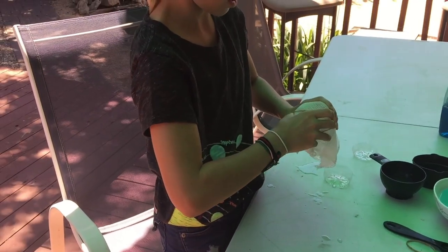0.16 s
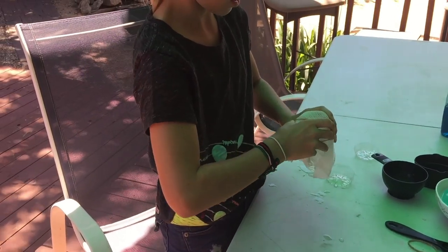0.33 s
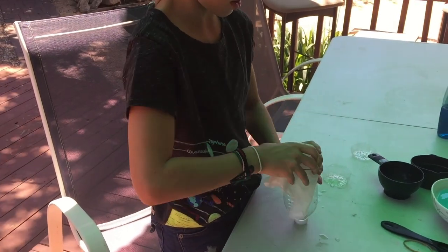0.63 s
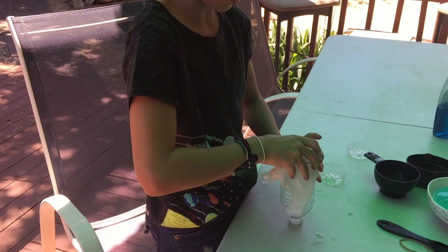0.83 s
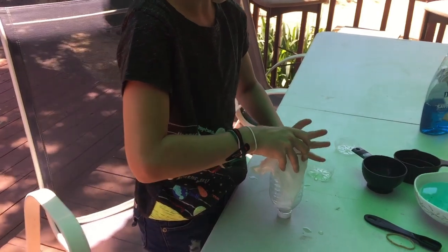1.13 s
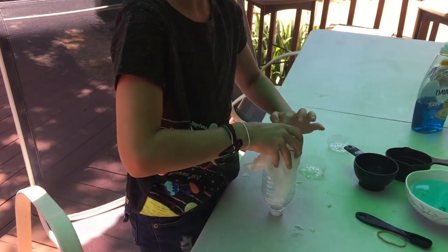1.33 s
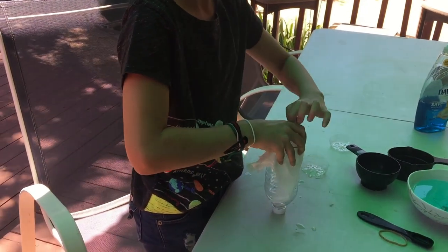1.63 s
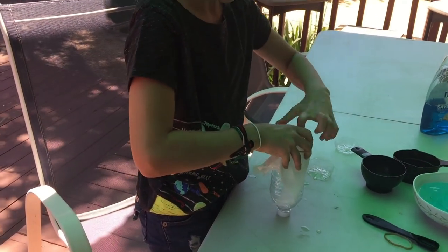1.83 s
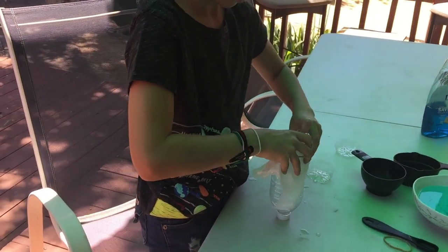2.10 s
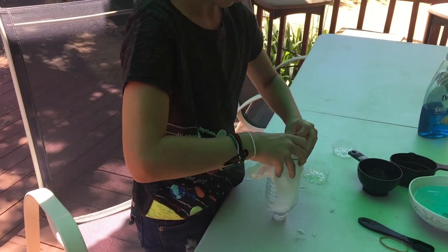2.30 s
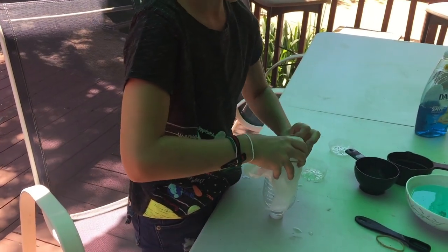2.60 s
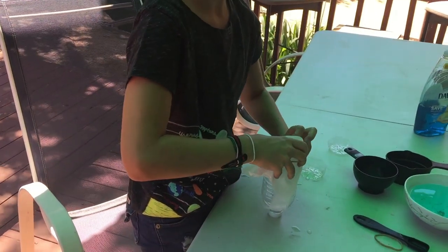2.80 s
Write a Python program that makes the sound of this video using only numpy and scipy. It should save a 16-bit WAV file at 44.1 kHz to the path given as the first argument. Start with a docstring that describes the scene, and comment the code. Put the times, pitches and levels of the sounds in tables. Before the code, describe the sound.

A thin plastic bottle crinkles and snaps under squeezing hands, with one dull knock on a table.

```python
"""A garden table outdoors: hands grip and squeeze a thin plastic bottle, and its wall buckles in sharp snaps.
Snaps, single or in clusters, layer band-limited noise bursts, a falling hollow pop and ringing wall modes.
The upturned bottle knocks on the table (burst, pop, table modes) and its neck skids briefly in tiny slips.
Fingers pat (short sine thuds) and rub (coloured friction grains); faint squeaks are sagging sine tones.
Decaying noise echoes make deck and walls answer snaps and knock, over a quiet hush of coloured noise."""
import sys
import numpy as np
from scipy import signal
from scipy.fft import rfft, irfft, next_fast_len
from scipy.io import wavfile
from scipy.ndimage import uniform_filter1d, map_coordinates

SR = 44100
rng = np.random.default_rng(int(sys.argv[2]) if len(sys.argv) > 2 else 0)


def put_to_file(sound):
    """Save the sound as 16-bit audio at rate SR, in the file named by the first command-line argument."""
    columns = np.atleast_2d(sound).T  # one column per channel
    safe = np.clip(columns, -1, 1)
    whole_steps = np.round(safe * 32767)
    wavfile.write(sys.argv[1], SR, whole_steps.astype(np.int16))


N = 130095  # samples


# buckles of the wall: t/s, then level/dB of hollow body, panel, crack, click and sizzle
BUCKLES = [(0.4115, -48.5, -32.5, -39, -55, -69), (0.4188, -49.5, -37.5, -33.5, -32, -40.5),
           (0.4474, -46, -46, -65, -67, -72), (0.4751, -49, -42.5, -42, -52.5, -77),
           (0.5442, -43, -37, -36, -41.5, -55), (0.6031, -56, -40.5, -34.5, -41.5, -45),
           (0.6177, -74, -48, -42, -58, -66), (0.631, -56, -48, -39.5, -40, -55),
           (0.7358, -40, -61, -48, -53.5, -75), (0.904, -45, -43, -44.5, -54, -70),
           (0.993, -58, -57, -59, -62, -68), (1.012, -70, -50, -68, -67, -63),
           (1.0408, -55.5, -58, -70, -79, -84), (1.0863, -42.5, -31, -28.5, -29, -37),
           (1.2299, -56, -57, -57, -58, -56), (1.2524, -42.5, -19, -22.5, -21.5, -26),
           (1.3591, -49, -42.5, -44.5, -46.5, -58), (1.4673, -55.5, -38.5, -27.5, -27, -32),
           (1.5267, -43.5, -33.5, -29, -38.5, -62), (1.556, -47.5, -29, -21.5, -22, -32.5),
           (1.5756, -51, -33, -37, -48, -56), (1.6924, -41.5, -42, -35, -38, -43),
           (1.696, -30.5, -25, -23.5, -22.5, -27), (1.7159, -37.5, -29.5, -20, -20.5, -29.5),
           (1.874, -74, -48, -41.5, -43.5, -47.5), (1.9814, -62, -50.5, -57.5, -77, -78),
           (2.0499, -49.5, -30, -23.5, -22.5, -33), (2.2448, -41.5, -38, -37.5, -52, -76),
           (2.2864, -36.5, -28.5, -33, -37, -45), (2.3163, -63, -35, -38, -42.5, -67),
           (2.3547, -42, -29.5, -29.5, -33, -42), (2.4096, -42.5, -45, -53, -44, -46),
           (2.4139, -35.5, -23.5, -22.5, -22.5, -26.5), (2.5666, -51, -32.5, -27.5, -37, -42),
           (2.5722, -41, -33, -25.5, -30.5, -40), (2.576, -50, -26, -24, -26.5, -30),
           (2.5877, -42.5, -24, -20, -23.5, -30), (2.6125, -39, -24.5, -24.5, -28, -29.5),
           (2.6232, -42, -31.5, -24, -23.5, -30.5), (2.7988, -32.5, -31.5, -43.5, -53, -72),
           (2.811, -40, -36.5, -25.5, -24.5, -42.5)]
# those five layers, low to high: lower edge f/Hz, upper edge f/Hz
LAYER_BANDS = [(220, 1000), (1300, 2700), (2700, 4700), (4700, 9300), (9300, 16000)]
# their envelopes: rise t/s, buckle t60 t/s, ring level/dB against the buckle, ring t60 t/s
LAYER_ENVELOPES = [(0.0013, 0.018, 2, 0.046), (0.000916, 0.0068, -12.5, 0.027),
                   (.0007, 0.0065, -29.5, 0.072), (0.00043, 0.0055, -15, 0.043),
                   (0.00051, 0.0076, -14.5, 0.055)]
# modes of the bottle wall: f/Hz, relative level/dB, t60 t/s
WALL_MODES = [(416, -15.5, 0.021), (525, -5, 0.057), (605, -17, 0.014), (1532, -6, 0.035),
              (1780, -18, .025), (2543, -14.5, 0.048), (3575, -17, 0.032), (4398, -12.5, 0.033),
              (5133, -4.5, 0.017)]
MODE_SPREAD = 0.031  # the grip retunes the modes (share of f)
MODE_RISE_S = 0.00045
BODY_NOISE_DB = -4  # the irregular share of the hollow body
SIDES = 3


def snaps():
    """Each buckle bursts and pops, then the wall rings; every side of the bottle radiates its own version."""
    out = np.zeros(N)
    t = np.arange(SR // 12) / SR
    filters = [signal.butter(3, band, 'band', fs=SR, output='sos') for band in LAYER_BANDS]
    envelopes = []
    for rise, t60, ring_db, ring_t60 in LAYER_ENVELOPES:
        buckle = amp(-60 * np.maximum(t - rise, 0) / t60)
        wall_ring = amp(ring_db - 60 * t / ring_t60)
        envelopes.append(np.minimum(t / rise, 1) ** 2 * (buckle + wall_ring))

    for s, *levels in BUCKLES:
        for side in range(SIDES):
            modes = ring(WALL_MODES, t, MODE_SPREAD) * (1 - np.exp(-t / MODE_RISE_S))
            bursts = []
            for sos, envelope in zip(filters, envelopes):
                noise = unit(signal.sosfilt(sos, rng.standard_normal(2 * len(t))))
                bursts.append(noise[len(t):] * envelope)  # second half: the filter has settled
            bursts[0] = amp(BODY_NOISE_DB) * bursts[0] + pop(t)
            snap = np.zeros(len(t))
            for db, sos, burst in zip(levels, filters, bursts):
                snap += amp(db) * struck(signal.sosfilt(sos, burst + modes))
            add(out, s, answer(snap) / np.sqrt(SIDES))
        add(out, s, snap)  # only the last side is heard directly
    return out


# low bending waves arrive highest first
POP_START_HZ, POP_END_HZ, POP_GLIDE_S = 1078, 476.8, 0.00215
# level before the hit is scaled, time of the peak, pitch scatter (log share)
POP_DB, POP_PEAK_S, POP_SPREAD = -5, 0.0031, 0.064


def pop(t):
    """The hollow part of a hit: a few cycles that fall in pitch."""
    glide = POP_END_HZ + (POP_START_HZ - POP_END_HZ) * np.exp(-t / POP_GLIDE_S)
    hz = glide * np.exp(POP_SPREAD * rng.standard_normal())
    swell = t / POP_PEAK_S * np.exp(1 - t / POP_PEAK_S)
    return amp(POP_DB) * swell * np.sin(2 * np.pi * np.cumsum(hz) / SR)


# tone of the dull crack: f/Hz, level/dB
CRACK_COLOUR = [(60, -58), (150, -5), (260, -18), (470, 5.5), (720, -2), (1000, -8), (1250, -12),
                (1560, -5.5), (2300, -21.5), (3500, -19.5), (5000, -31), (9000, -43), (15000, -50)]
# modes of the table with the bottle on it: f/Hz, relative level/dB, t60 t/s
TABLE_MODES = [(159, -12.5, 0.51), (353, 12, 0.078), (451, 4, 0.061), (675, 5, 0.045), (767, -19, 0.045),
               (982, 4, 0.13), (1502, 4, 0.14), (1940, -8, 0.12)]
KNOCK_S, KNOCK_DB, CRACK_T60_S = .6528, -19.5, 0.016
KNOCK_POP_DB, KNOCK_RING_DB = -7.5, -12.5  # against the crack


def knock():
    """The neck lands on the table: a dull crack, the bottle's hollow pop and the table's ring."""
    out = np.zeros(N)
    t = np.arange(SR // 4) / SR
    burst = rng.standard_normal(len(t)) * amp(-60 * t / CRACK_T60_S)
    crack = struck(coloured(burst, CRACK_COLOUR))
    hollow = amp(KNOCK_POP_DB) * struck(pop(t))
    table = amp(KNOCK_RING_DB) * struck(ring(TABLE_MODES, t, 0.0055))
    hit = amp(KNOCK_DB) * struck(crack + hollow + table)
    add(out, KNOCK_S, hit)
    add(out, KNOCK_S, answer(hit))
    return out


# course of the skid: t/s, level/dB
SKID_LEVEL = [(.66, -60), (.672, -43), (.692, -44), (.709, -35), (.722, -36.5), (.742, -45.5), (.77, -50),
              (.795, -49.5), (.825, -63)]
# tone of the scrape: f/Hz, level/dB
SCRAPE_COLOUR = [(60, -43), (160, -9), (250, -21), (480, -1), (700, -2), (1000, -6.5), (1500, -11.5),
                 (2400, -16.5), (4000, -22.5), (6000, -38), (13000, -55)]
SLIPS_PER_S, SKID_RING_DB = 1400, -5.5  # ring against the scrape


def skid():
    """The neck slides in tiny slips that keep the table ringing."""
    grains = slips(SLIPS_PER_S)
    table = ring(TABLE_MODES, np.arange(SR // 4) / SR, 0.0036)
    ringing = signal.fftconvolve(grains, table)[:N]
    scrape = unit(coloured(grains, SCRAPE_COLOUR))
    return amp(curve(SKID_LEVEL)) * (scrape + amp(SKID_RING_DB) * unit(ringing))


# soft pats of the fingers: t/s, peak level/dB, f/Hz, length t/s
FINGER_PATS = [(1.238, -36.5, 97, 0.011), (1.248, -49, 59.4, 0.035), (2.018, -36.5, 149, 0.01),
               (2.022, -43, 73, .02), (2.203, -50, 322, 0.0073), (2.9024, -39, 406, 0.0057)]


def pats():
    """Soft fingers push the bottle: a low thud of a cycle or two."""
    out = np.zeros(N)
    for s, db, hz, length in FINGER_PATS:
        t = np.arange(int(length * SR)) / SR
        swell = np.sin(np.pi * t / length)
        add(out, s, amp(db) * swell * np.sin(2 * np.pi * hz * t))
    return out


# course of the rubbing before its trim: t/s, level/dB
RUB_LEVEL = [(-.05, -73.5), (.17, -73), (.25, -61), (.37, -73.5), (.6, -60), (.84, -72), (.96, -78),
             (1.01, -56.5), (1.1, -63.5), (1.22, -60.5), (1.42, -68), (1.8, -68), (1.94, -73), (2.02, -64),
             (2.21, -65), (2.52, -61.5), (2.76, -59), (3, -68.5)]
# tone of skin on plastic: f/Hz, level/dB
SKIN_COLOUR = [(100, -8), (250, -8), (430, 2), (750, 5), (1500, 6), (2500, 7), (4000, -0.5), (6200, 0),
               (8500, -11.5), (13000, -13), (16000, -42)]
RUB_TRIM_DB, RUB_FLUTTER_DB, RUB_GRAINS_PER_S = 2.5, 3, 6500


def rub():
    """Skin drags faintly over the plastic in a dense run of friction grains."""
    level = curve(RUB_LEVEL) + RUB_TRIM_DB + RUB_FLUTTER_DB * wobble(30)
    grains = coloured(slips(RUB_GRAINS_PER_S), SKIN_COLOUR)
    return amp(level) * unit(patchy(grains))


# faint squeaks: t/s, length t/s, start f/Hz, end f/Hz, peak level/dB
FAINT_SQUEAKS = [(0.314, 0.045, 1233, 1230, -59), (1.868, 0.072, 1400, 1080, -58.5),
                 (2.174, 0.07, 3830, 3660, -57.5)]


def squeaks():
    """Faint, slightly unsteady tones in the background that sag in pitch."""
    out = np.zeros(N)
    for s, length, start, end, db in FAINT_SQUEAKS:
        u = np.linspace(0, 1, int(length * SR))
        hz = (start + (end - start) * u) * (1 + 0.054 * wobble(220)[:len(u)])
        add(out, s, amp(db) * np.sin(np.pi * u) * np.sin(2 * np.pi * np.cumsum(hz) / SR))
    return out


# decay of the late answer: f/Hz, t60 t/s
LATE_T60 = [(300, 0.38), (1500, 0.24), (4500, 0.32), (9000, 0.26), (15000, 0.22)]
# tone of the late answer: f/Hz, level/dB
LATE_COLOUR = [(200, -4.5), (700, -2), (2000, -1), (6000, -1.5), (15000, 0)]
LATE_DB, NEAR_DB, NEAR_T60_S, ARRIVE_S = -16, -10, 0.1, 0.0052


def answer(x):
    """The quick scatter from table and body and the later answer of deck and walls, as decaying noise."""
    t = np.arange(SR // 2) / SR
    late_noise, near_noise = rng.standard_normal((2, len(t)))
    hz, s, z = signal.stft(late_noise, SR, nperseg=256)
    decay_db = along(LATE_COLOUR, hz)[:, None] - 60 * s / along(LATE_T60, hz)[:, None]
    late = signal.istft(z * amp(decay_db), SR, nperseg=256)[1][:len(t)]
    arrive = 1 - np.exp(-(t / ARRIVE_S) ** 2)
    near = near_noise * arrive * amp(-60 * t / NEAR_T60_S)
    tail = amp(LATE_DB) * unit(late * arrive) + amp(NEAR_DB) * unit(near)
    return signal.fftconvolve(x, tail / np.sqrt(len(t)))


# tone of the garden air: f/Hz, relative level/dB
AIR_COLOUR = [(15, -24), (35, -11), (55, 6), (95, 8), (160, 3.5), (280, -9.5), (410, 2), (560, -17.5),
              (780, -19.5), (1200, -5.5), (1900, -16.5), (2500, -8), (4800, -12.5), (6200, -10.5),
              (8500, -21.5), (14000, -20), (16000, -25)]
HUSH_DB, HUSH_WAVER_DB = -63.5, 2.3


def hush():
    """Quiet, uneven garden air: coloured noise that wavers in level."""
    air = coloured(rng.standard_normal(N), AIR_COLOUR)
    return amp(HUSH_DB + HUSH_WAVER_DB * wobble(7.06)) * unit(patchy(air))


PATCH_DB, PATCH_TOP_HZ = 4.5, 5000  # swing in the lows, frequency where it halves


def patchy(x):
    """Let the bands of a sound swell and fade on their own; the high hiss stays smoother."""
    hz, _, z = signal.stft(x, SR, nperseg=1024)
    field = uniform_filter1d(rng.standard_normal(z.shape), size=4, axis=0)  # blur across frequency
    field = unit(uniform_filter1d(field, size=5, axis=1))  # blur across time
    swing_db = PATCH_DB * field / (1 + hz[:, None] / PATCH_TOP_HZ)
    return signal.istft(z * amp(swing_db), SR, nperseg=1024)[1][:N]


def ring(modes, t, spread):
    """Damped modes, each with a fresh strength and a slight detuning."""
    hz, db, t60 = np.transpose(modes)[:, :, None]
    strength, detune = rng.standard_normal((2, len(modes), 1))
    level = np.sign(strength) * amp(db + 2 * strength - 60 * t / t60)
    return np.sum(level * np.sin(2 * np.pi * hz * (1 + spread * detune) * t), axis=0)


def slips(rate):
    """Tiny friction impulses of random size, rate a second."""
    return (rng.random(N) < rate / SR) * rng.standard_normal(N)


def coloured(x, points):
    """x through a causal minimum-phase filter with the given (Hz, dB) shape."""
    m = 2 * next_fast_len(len(x) // 2 + 4096)
    cepstrum = irfft(np.log(amp(along(points, np.fft.rfftfreq(m, 1 / SR)))), m)
    cepstrum[1:m // 2] *= 2  # fold onto positive time
    cepstrum[m // 2 + 1:] = 0
    return irfft(rfft(x, m) * np.exp(rfft(cepstrum)), m)[:len(x)]


def struck(x):
    """Scale a hit so that its opening 6 ms have rms 1."""
    return x / np.sqrt(np.mean(x[:round(.006 * SR)] ** 2) + 1e-20)


def unit(x):
    """Scale to rms 1."""
    return x / np.sqrt(np.mean(x ** 2) + 1e-20)


def amp(db):
    """Decibels to gain."""
    return 10 ** (np.asarray(db) / 20)


def along(points, hz):
    """Interpolate (Hz, value) points on a log frequency axis."""
    f, v = np.transpose(points)
    return np.interp(np.log(hz + 1), np.log(f + 1), v)


def curve(rows):
    """(s, dB) rows as one level per sample, -120 dB outside them."""
    return np.interp(np.arange(N) / SR, *np.transpose(rows), left=-120, right=-120)


def wobble(rate):
    """A smooth random curve, rate knots a second."""
    knots = rng.standard_normal(int(N * rate / SR) + 4)
    return map_coordinates(knots, [np.arange(N) * rate / SR])


def add(track, s, x):
    """Mix x into the track at time s."""
    i = max(round(s * SR), 0)
    track[i:i + len(x)] += x[:max(N - i, 0)]


def scene():
    """All layers summed to one channel."""
    return (snaps() + knock() + skid() + pats() + rub() + squeaks() + hush())[None]


LOW_CUT_HZ, TOP_HZ = 37, 15950


def record(dry):
    """Cut the deep rumble and, very steeply, everything above the band limit."""
    m = next_fast_len(N + SR // 2)
    low_cut = signal.butter(2, LOW_CUT_HZ, 'high', fs=SR, output='sos')
    thin = signal.sosfilt(low_cut, dry)
    top_cut = np.sqrt(1 + (np.fft.rfftfreq(m, 1 / SR) / TOP_HZ) ** 120)
    return irfft(rfft(thin, m) / top_cut, m)[..., :N]


dry = scene()
out = record(dry)
put_to_file(out)
```